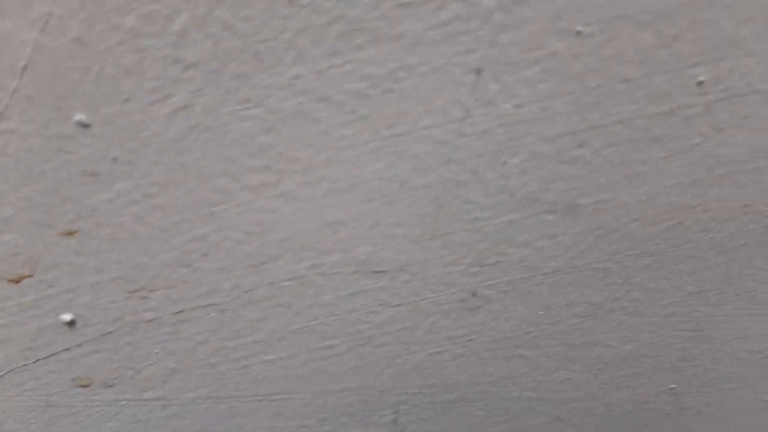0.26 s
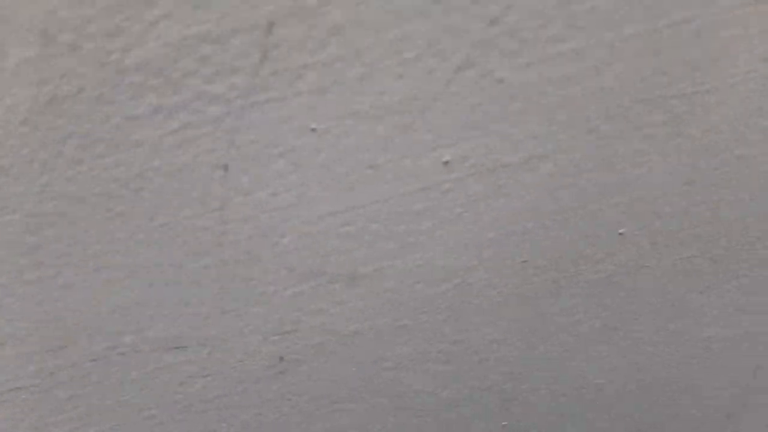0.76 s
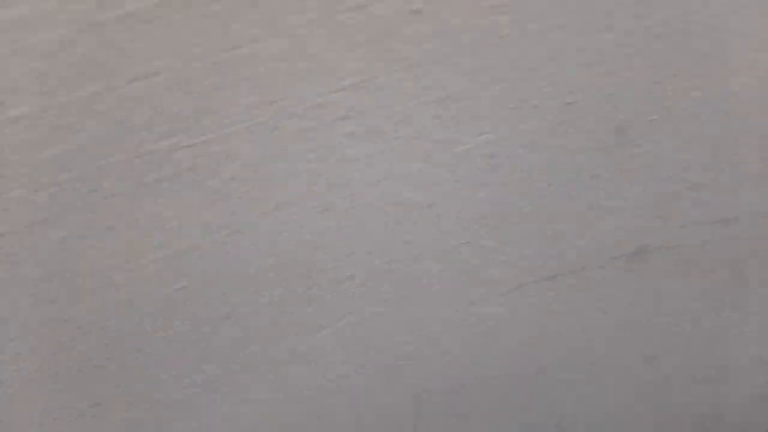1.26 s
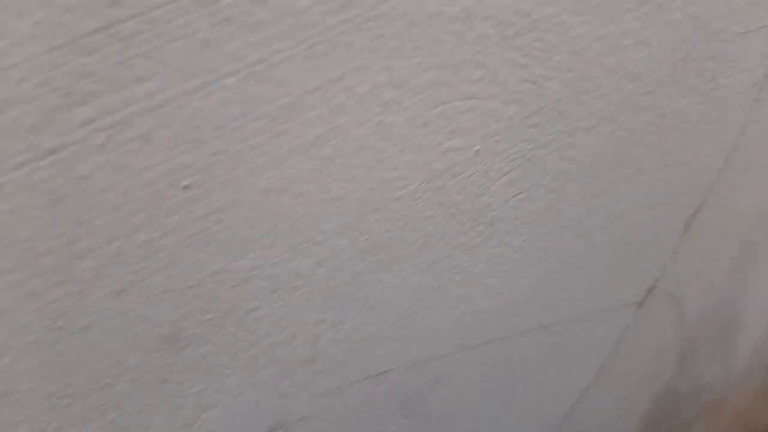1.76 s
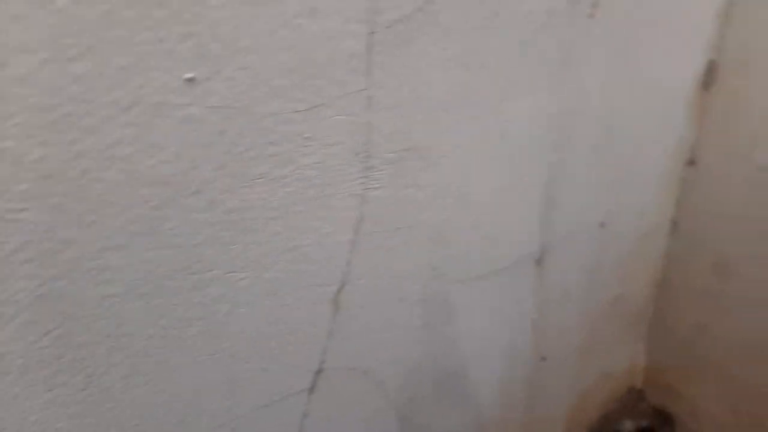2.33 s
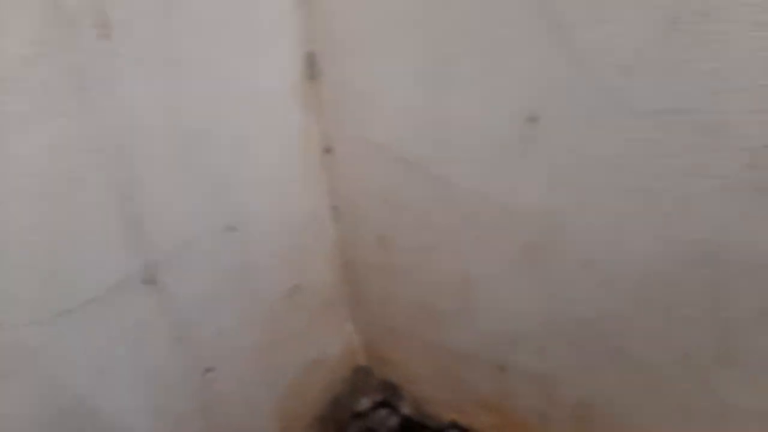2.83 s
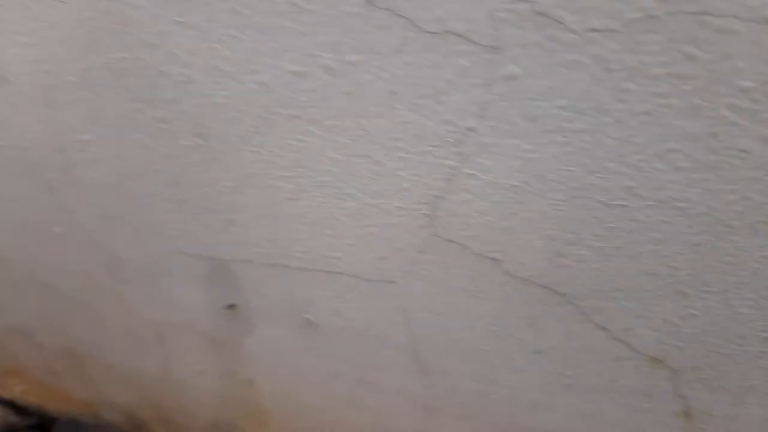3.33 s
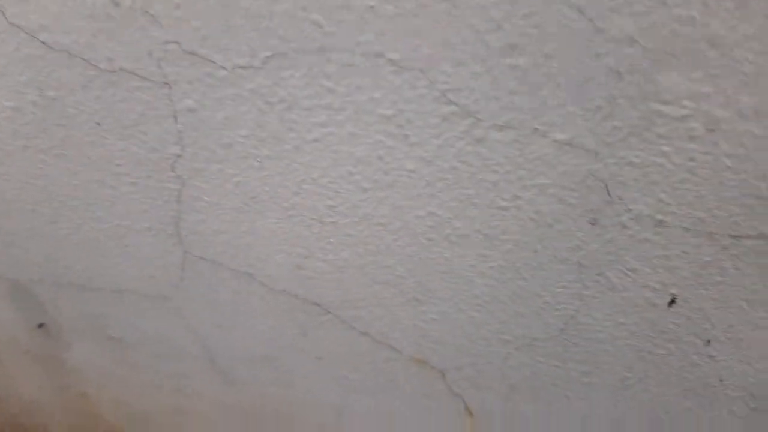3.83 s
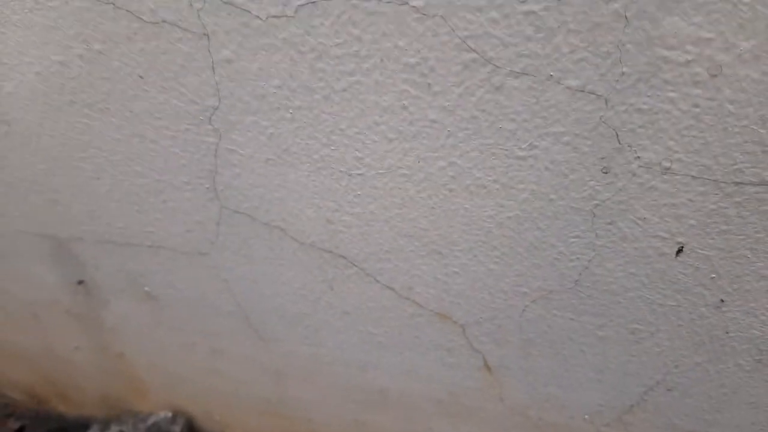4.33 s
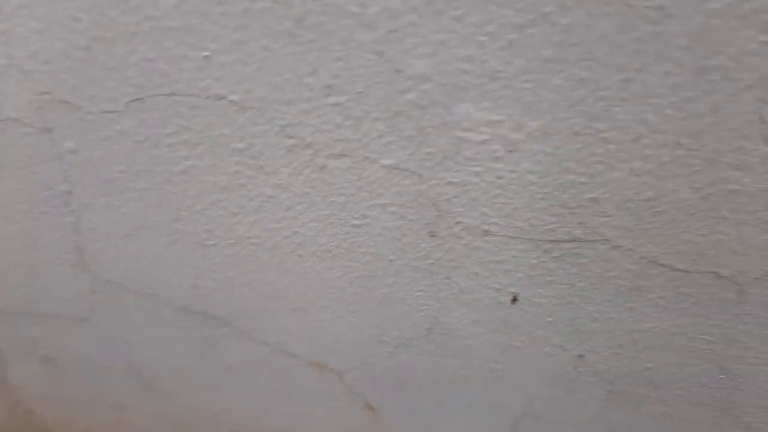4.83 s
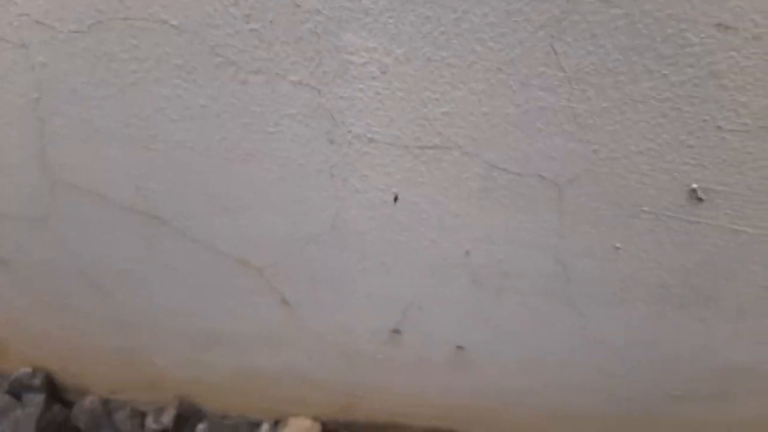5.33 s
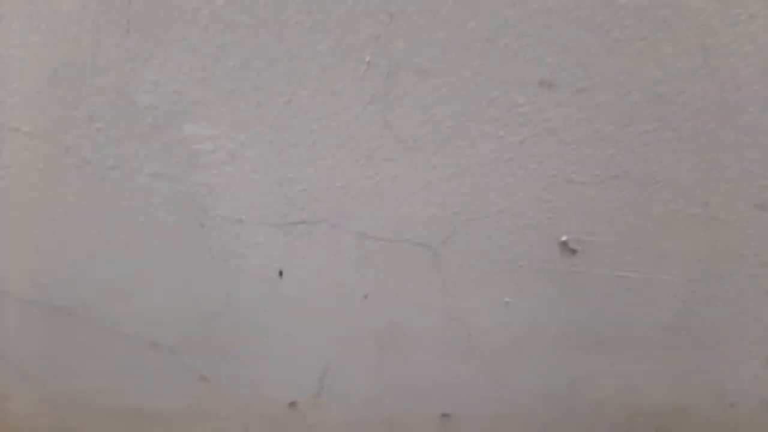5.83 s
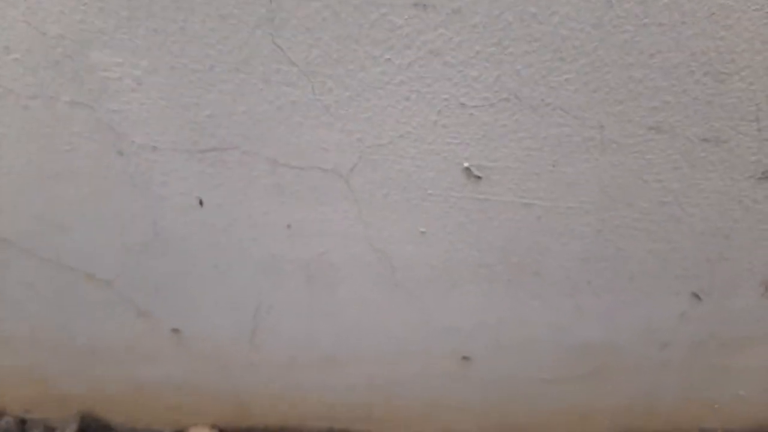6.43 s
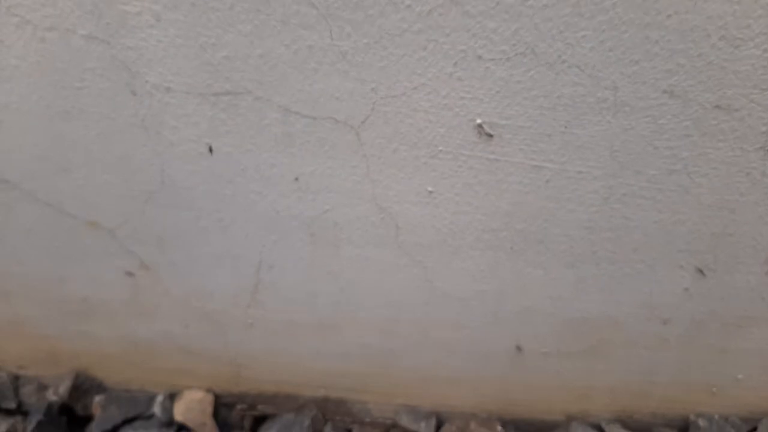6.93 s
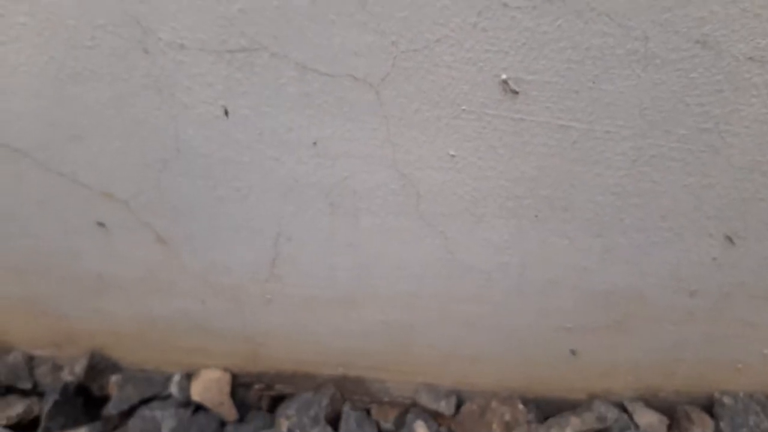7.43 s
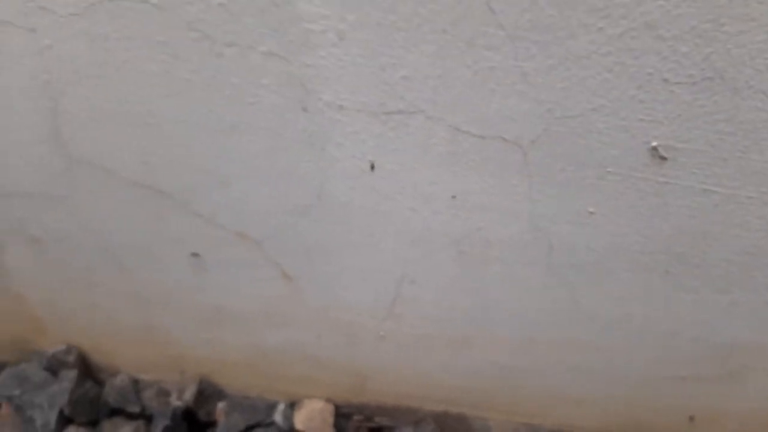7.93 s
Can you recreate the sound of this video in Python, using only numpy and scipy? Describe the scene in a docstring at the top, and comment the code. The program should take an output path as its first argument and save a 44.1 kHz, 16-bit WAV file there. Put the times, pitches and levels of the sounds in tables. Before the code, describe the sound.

An outdoor walled corner heard by close stereo phone microphones just above coarse gravel. Low, slightly left-leaning far machinery hum and a faint airy hiss continue throughout, the hum swelling a little near 4 s. From 0 to 2.4 s there are only soft sole rubs and sparse, tiny stone ticks. From 2.5 s ticks crowd together with light fizz; around 3.6-4.7 s gritty grinding and knocks grow. At 4.85-5.05 s comes the heaviest crunch: loud stony cracks, dull short thuds and a brief echo off the walls. At 5.4-5.7 s a bright, sharp, crackling slide bursts out, then thins away by about 6.1 s. A few faint clicks follow near 6.5-6.7 s. At 6.85-7.2 s a finger rubs roughly on the left only. At 7.2-7.4 s a very faint high whistle arches up and down. One tiny tick at 7.75 s, then hum.

```python
"""Someone crouches with a phone in a walled corner, its microphones just above coarse gravel; far machinery hums
in the corner's resonances and the air hisses throughout. First come faint rubs and sparse stone ticks; from 2.5 s
they crowd together. Weight shifts make the stones fizz and grind, strongest with thuds from 4.9 s, then they thin out.
At 6.9 s a finger brushes the left microphone port, and at 7.2 s a thin whistle passes. Stones are short noise
bursts and damped rings, hum and hiss are filtered noise, and the whistle is one gliding sine."""
import sys
import numpy as np
from scipy import signal
from scipy.fft import rfft, irfft, next_fast_len
from scipy.io import wavfile
from scipy.ndimage import uniform_filter1d, map_coordinates

SR = 44100
rng = np.random.default_rng(int(sys.argv[2]) if len(sys.argv) > 2 else 0)


def dump(signal):
    """Clip the signal to [-1, 1] and save it as 16-bit WAV at the path in sys.argv[1]."""
    limited = np.clip(np.atleast_2d(signal).T, -1, 1)
    pcm = np.round(limited * 32767).astype(np.int16)
    wavfile.write(sys.argv[1], SR, pcm)


N = 360297
TOP_HZ = 15850  # band limit of the microphones

# stone contacts underfoot: (time [s], relative crack level [dB], relative knock level [dB], stone pitch [Hz])
STONE_CONTACTS = [(0.678, -50, -48.5, 2090), (0.9744, -62, -59, 1890), (1.112, -49.5, -52, 4600),
                  (1.2247, -71, -45.5, 2190), (1.3983, -44.5, -83, 10700), (1.5205, -44, -58.5, 12660),
                  (1.9487, -34, -48.5, 6940), (2.2419, -44.5, -43.5, 2062), (2.5087, -34.5, -39, 2320),
                  (2.612, -38.5, -44, 9030), (2.7, -46.5, -56, 9000), (2.7608, -38.5, -46.5, 13400),
                  (2.769, -42, -43, 4435), (2.805, -41, -49.5, 3660), (2.872, -42, -48, 8020),
                  (2.887, -43, -68, 9050), (2.9266, -43, -38.5, 2410), (2.948, -38.5, -53, 2426),
                  (2.991, -43.5, -57, 1590), (3.018, -40, -59, 4400), (3.134, -42, -69, 8990),
                  (3.4443, -40, -50, 12200), (3.62, -43.5, -36, 1180), (3.672, -33.5, -53, 5160),
                  (3.7339, -39, -39, 2550), (3.938, -35, -35.5, 1595), (3.9684, -30, -34, 2373),
                  (3.984, -33, -38.5, 9050), (4.091, -35.5, -62, 4500), (4.3054, -29.5, -42, 5520),
                  (4.338, -40, -35.5, 1506), (4.372, -31, -30, 2410), (4.4696, -31.5, -46, 4570),
                  (4.4973, -32.5, -31.5, 4174), (4.5805, -33.5, -50, 5775), (4.5979, -37, -34, 2002),
                  (4.635, -31.5, -41.5, 8930), (4.6745, -31, -35.5, 6000), (4.7482, -28, -33.5, 3000),
                  (4.809, -26.5, -41, 6000), (4.8597, -8.5, -22, 3100), (4.9004, -12.5, -20, 3210),
                  (4.949, -15.5, -25.5, 7580), (4.9621, -16.5, -20.5, 1400), (4.9703, -17.5, -31.5, 7960),
                  (5.0444, -24, -18.5, 2602), (5.087, -23, -25, 1907), (5.134, -25.5, -38, 1068),
                  (5.21, -27.5, -39, 2600), (5.238, -28.5, -35.5, 1676), (5.255, -26.5, -43.5, 1319),
                  (5.308, -32.5, -43, 1150), (5.3385, -20.5, -42, 2008), (5.353, -20, -37.5, 2522),
                  (5.4077, -13.5, -36, 8990), (5.435, -13, -41, 9520), (5.447, -4.5, -33.5, 12730),
                  (5.531, -7.5, -42.5, 11720), (5.5385, -15, -45.5, 4756), (5.5914, -17, -42.5, 12470),
                  (5.686, -15, -37.5, 11780), (5.709, -18.5, -42.5, 10870), (5.7717, -25.5, -57, 7430),
                  (5.8416, -29.5, -38, 2181), (5.931, -27, -43, 2440), (6.5122, -47, -53.5, 8770),
                  (6.5466, -51.5, -41.5, 2263), (6.735, -57.5, -50, 2994), (7.747, -46, -78, 7230)]


def ticks():
    """Each contact is a crack that rings briefly at the stone's pitch and a duller gritty knock."""
    cracks, knocks = np.zeros((2, N + SR)), np.zeros((2, N + SR))
    t = np.arange(SR // 8) / SR
    for s, crack_db, knock_db, hz in STONE_CONTACTS:
        grit, lean = rng.standard_normal((4, 2, len(t))), rng.standard_normal()
        here = slice(round(s * SR), round(s * SR) + len(t))
        # the ring dies over 30 cycles, so bigger, lower stones ring longer
        strike = amp(-60 * t * hz / 30) * (1 - np.exp(-t / 0.00028))
        strike = strike * (0.5 * grit[3, :1] + grit[3])  # partly shared by both microphones
        ring = signal.lfilter(*signal.iirpeak(hz, 3.5, SR), strike)
        high_pass = signal.butter(1, hz / 3, "high", fs=SR)
        snap = signal.lfilter(*high_pass, amp(-60 * t / 0.022) * grit[0])
        crack = ring / np.abs(ring).max() + 0.35 * snap
        crack = crack / np.abs(crack).max(axis=1, keepdims=True)
        cracks[:, here] += amp(crack_db + 2.0) * sides(1.1 * lean - 1.5)[:, None] * crack
        fade = amp(-60 * t / 0.024) + 0.023 * amp(-60 * t / 0.094)  # the blow, then the stone settling
        knock = fade * (grit[1] + 0.51 * grit[2, :1])
        knocks[:, here] += amp(knock_db + 12) * sides(lean + 3)[:, None] * knock
    return cracks[:, :N] + coloured_knock(knocks[:, :N])


# colour of stones grinding under load, shared by the knocks: (frequency [Hz], relative level [dB])
GRIND_COLOUR = [(120, -1), (250, 1.5), (450, -1), (1000, -5), (1500, -8.5), (3200, -13.5), (10000, -25)]


def coloured_knock(x):
    """Knocks share the low colour of grinding stones."""
    return filtered(x, lambda hz: amp(along(GRIND_COLOUR, hz)))


# how fast the walled corner falls silent: (frequency [Hz], 60 dB decay time [s])
WALL_DECAY = [(300, 0.767), (2000, 0.15), (10000, 0.18)]


def walls(x):
    """The corner answers within milliseconds with a noise tail; each frequency dies at its own speed."""
    hz, t, z = signal.stft(rng.standard_normal((2, SR // 3)), SR, nperseg=256)
    decay = amp(-60 * t / along(WALL_DECAY, hz)[:, None])
    tail = signal.istft(z * decay, SR, nperseg=256)[1]
    delayed = np.pad(x, ((0, 0), (150, 0)))  # samples, 3.4 ms
    return signal.fftconvolve(delayed, tail / np.linalg.norm(tail[0]), axes=1)[:, :N]


# colour of small contacts close to the microphones: (frequency [Hz], relative level [dB])
FIZZ_COLOUR = [(1500, -16), (3000, -9.5), (5000, -3), (8000, -5.5), (11000, -1.5), (14000, -2.5),
               (16000, -7)]


def gravel():
    """Small contacts fizz in the treble; loaded stones grind lower, click against each other and boom in the corner."""
    fizz_db, grind_db = load()
    fizz = crumbs(rate=220, spread_db=5.5, life=0.0039, bed=1.5)
    fizz = coloured(patchy(fizz, depth_db=2.5, span=12), FIZZ_COLOUR)
    sheen = fizz - filtered(fizz, lambda f: 1 / (1 + (f / 7000) ** 2))
    fizz = fizz + np.clip((fizz_db + 36.5) / 22, -.5, 1.5) * sheen  # a harder slide is brighter
    fizz = fizz + 0.2 * chips(rate=150, hz=9200, scatter=0.35, cycles=3.3, spread_db=7.5)
    grind = crumbs(rate=97, spread_db=1.0, life=0.0035, bed=2.4)
    grind = coloured(patchy(grind, depth_db=1.0, span=6), GRIND_COLOUR)
    grind = grind + 0.32 * chips(rate=140, hz=1595, scatter=.6, cycles=2.0, spread_db=8.0)
    grind = grind + 0.38 * ambient(resonances(CORNER_MODES[-3:]))  # only the upper modes boom
    fizz_gain = amp(fizz_db + 2.0 + 0.5 * wobble(30)) * sides(-0.69)[:, None]
    grind_gain = amp(grind_db + 1.0 + 1.5 * wobble(25)) * sides(3.9)[:, None]
    return fizz_gain * fizz + grind_gain * grind


# weight shifting on the gravel: (full-load time [s], build-up [s], hold [s],
# relative fizz level [dB], relative grind level [dB])
WEIGHT_SHIFTS = [(0.0, .01, 0.082, -65.5, -67), (2.497, 0.016, 0.018, -56.5, -58),
                 (2.603, 0.11, 0.089, -60.5, -61.5), (2.754, 0.058, 0.33, -55.5, -61),
                 (3.605, 0.043, 0.069, -46.5, -48.5), (3.967, 0.18, 0.02, -53.5, -52.5),
                 (4.147, 0.19, 0.19, -44.5, -53), (4.484, .07, .01, -45.5, -43.5),
                 (4.622, 0.056, 0.13, -50, -45), (4.798, 0.37, 0.042, -43.5, -43),
                 (4.86, 0.014, 0.019, -45.5, -28), (4.961, 0.07, 0.012, -33.5, -34.5),
                 (5.048, 0.022, 0.13, -41.5, -34.5), (5.363, 0.065, 0.067, -47.5, -36),
                 (5.445, 0.076, 0.021, -21.5, -44.5), (5.535, .004, 0.016, -28, -44.5),
                 (5.573, 0.073, 0.037, -30.5, -35.5), (5.689, 0.0034, 0.016, -32, -50),
                 (5.915, 0.6, 0.12, -50, -47), (6.131, .1, 0.1, -60.5, -64),
                 (6.523, 0.026, 0.066, -61.5, -72)]
# faint stirring between the shifts: (time [s], relative fizz level [dB], relative grind level [dB])
FAINT_STIRRING = [(0, -70.5, -76), (1.4, -72.5, -81), (2.45, -72, -75.5), (3.2, -69, -59.5),
                  (3.55, -58, -91.5), (3.9, -62.5, -66.5), (5.3, -47, -47.5), (6.3, -75, -87),
                  (6.45, -84, -99)]
BUILD_DB = 23.5  # climb over each build-up
RELEASE_DB_PER_S, GRIND_RELEASE_DB_PER_S = 151, 139.5  # fall after the hold


def load():
    """Fizz and grind levels in dB: every shift builds up, holds and lets go, over the faint stirring."""
    t = np.arange(N) / SR
    fizz_db, grind_db = curves(FAINT_STIRRING)
    fizz_power, grind_power = amp(fizz_db) ** 2, amp(grind_db) ** 2
    for s, build, hold, fizz_db, grind_db in WEIGHT_SHIFTS:
        early_db = BUILD_DB * np.clip(s - t, 0, 1) / abs(build)
        late = np.clip(t - s - hold, 0, 1)  # seconds since the hold ended
        fizz_power = fizz_power + amp(fizz_db - early_db - RELEASE_DB_PER_S * late) ** 2
        grind_power = grind_power + amp(grind_db - early_db - GRIND_RELEASE_DB_PER_S * late) ** 2
    return 10 * np.log10(fizz_power), 10 * np.log10(grind_power)


def crumbs(rate, spread_db, life, bed):
    """Noise in sudden short bursts of random size over an even bed; both ports get the same bursts."""
    sizes = amp(spread_db * np.minimum(rng.exponential(size=N), 3))
    starts = (rng.random(N) < rate / SR) * sizes
    bursts = signal.lfilter([1], [1, -np.exp(-1 / (life * SR))], starts)
    return (bed + unit(bursts)) * rng.standard_normal((2, N))


def chips(rate, hz, scatter, cycles, spread_db):
    """Many tiny stone clicks, each a damped ring at its own pitch, strength and side."""
    count, t = int(rate * N / SR), np.arange(SR // 100) / SR
    when, size = rng.random((count, 2)).T
    pitch, lean = rng.standard_normal((count, 2)).T
    pitch = np.clip(hz * np.exp(scatter * pitch), 300, TOP_HZ)[:, None]
    strength = amp(-spread_db * np.log(size + 0.098))[:, None]
    rings = strength * np.exp(-t * pitch / cycles) * np.sin(2 * np.pi * pitch * t)
    where = ((when * N).astype(int)[:, None] + np.arange(len(t))).ravel()
    ports = [np.bincount(where, (g[:, None] * rings).ravel(), N + SR)[:N] for g in sides(4 * lean)]
    return unit(np.array(ports))


# weight landing on the ground: (time [s], relative level [dB])
LANDINGS = [(3.968, -22.5), (4.859, -10), (4.899, -21.5), (4.952, -19.5), (5.046, -30)]
# modes of the stone bed under a foot: (frequency [Hz], relative level [dB], 60 dB decay time [s])
STONE_BED_MODES = [(116.4, 6.5, 0.046), (169.5, 5, 0.088), (281.3, 3, 0.092), (422.7, -5, 0.1208)]


def thuds():
    """A foot settling pushes the stone bed, which rings low and briefly."""
    out, t = np.zeros((2, N + SR)), np.arange(SR // 5) / SR
    ring = sum(amp(level - 60 * t / t60) * np.sin(2 * np.pi * hz * t) for hz, level, t60 in STONE_BED_MODES)
    ring = ring * (1 - np.exp(-t / 0.0029))  # the sole lands softly
    for s, db in LANDINGS:
        out[:, round(s * SR):][:, :len(t)] += amp(db - 8.0) * ring
    return filtered(out[:, :N], lambda hz: sides(along(PORT_LEAN, hz)))


# a sole rubbing softly over stones: (start time [s], length [s], level before the swell [dB], centre frequency [Hz])
SOLE_RUBS = [(0, 0.16, -77, 1810), (0.323, 0.05, -64, 890), (0.417, 0.12, -64, 1960),
             (0.672, 0.085, -52, 570), (0.93, 0.16, -65, 543), (1.225, 0.074, -58, 705),
             (1.476, 0.059, -62, 547), (2.24, 0.09, -59, 1780), (3.097, 0.069, -51, 1670),
             (3.581, 0.19, -46.5, 503), (3.9, 0.18, -49.5, 1900), (5.43, 0.06, -33.5, 406.4),
             (5.5, 0.2, -40, 420.4), (5.679, 0.11, -39.5, 1011), (6.534, 0.11, -59, 1080)]


def rubs():
    """Gritty noise in one resonance; each rub starts quickly and trails off."""
    out, grit = np.zeros((2, N)), crumbs(rate=200, spread_db=6.0, life=0.0065, bed=0.96)
    for s, length, db, hz in SOLE_RUBS:
        u = np.arange(int(length * SR)) / (length * SR)
        here = slice(round(s * SR), round(s * SR) + len(u))
        peak = signal.iirpeak(hz, 1.4, SR)
        band = signal.lfilter(*peak, signal.lfilter(*peak, grit[:, here]))
        swell = np.sin(np.pi * u ** 0.53)
        out[:, here] += amp(db) * sides(2.6)[:, None] * swell * unit(band)
    return out


# finger strokes touching the left port: (start time [s], length [s], hiss level [dB], scrape level [dB])
FINGER_STROKES = [(6.854, 0.005, -57.5, -39), (6.873, 0.079, -45, -27.5), (6.962, 0.0038, -50.5, -49),
                  (6.998, 0.049, -60, -44), (7.027, 0.073, -56, -59), (7.086, 0.13, -45, -59)]
# colour of the smooth hiss of skin: (frequency [Hz], relative level [dB])
SKIN_COLOUR = [(470, -42), (800, -25), (1420, -2.5), (2500, -11.5), (4500, -3), (16000, -13.5)]
# colour of the rough scrape: (frequency [Hz], relative level [dB])
SCRAPE_COLOUR = [(150, -8), (350, 3.5), (700, 1), (1150, -6.5), (1500, -26), (2200, -18.5), (3200, -35.5)]


def finger():
    """Skin sliding over one port: a smooth hiss and a rough low scrape that the other port does not get."""
    t, hiss_gain, scrape_gain = np.arange(N) / SR, 0, 0
    for s, length, hiss_db, scrape_db in FINGER_STROKES:
        press = np.sin(np.pi * np.clip((t - s) / length, 0, 1))  # each stroke swells and lets go
        hiss_gain = hiss_gain + amp(hiss_db) * press ** 2.0
        scrape_gain = scrape_gain + amp(scrape_db) * press ** 0.57
    rough = crumbs(rate=1000, spread_db=0.0, life=0.0013, bed=0.31)[0]
    hiss = hiss_gain * coloured(rng.standard_normal(N), SKIN_COLOUR)
    scrape = scrape_gain * coloured(rough, SCRAPE_COLOUR)
    return (hiss + scrape) * [[1], [0]]  # left only


WHISTLE_S, WHISTLE_LENGTH_S, WHISTLE_DB = 7.2, 0.23, -74  # start, length, mean level at the crest
LOW_HZ, ARCH_HZ, CREST = 10160, 1100, 0.66  # pitch at rest, rise to the crest, place of the crest within the length


def whistle():
    """A faint high tone that arches up and down, louder near the crest, unsteady in strength and pitch."""
    u = (np.arange(N) / SR - WHISTLE_S) / WHISTLE_LENGTH_S
    arch = np.exp(-((u - CREST) / 0.24) ** 2)
    gate = uniform_filter1d(1. * ((u > 0) & (u < 1)), size=400)
    level_db = WHISTLE_DB - 10 * (1.0 - arch) + 4.3 * wobble(84)
    hz = LOW_HZ + ARCH_HZ * arch + 90 * wobble(150)
    return gate * amp(level_db) * np.sin(2 * np.pi * np.cumsum(hz) / SR)


# far machinery hum: (time [s], level [dB])
HUM_LEVEL = [(0.0, -43), (3.71, -42), (3.96, -37.5), (8.17, -44.5)]
# resonances of the walled corner: (frequency [Hz], width before the skirts are steepened [Hz], relative level [dB])
CORNER_MODES = [(50.4, 12, -9), (73.56, 11, 3.5), (108.3, 44, 0), (154.1, 12, -2.5), (183.9, 26.2, -5.5),
                (296.4, 44, -14.5), (420.5, 54, -23), (535.4, 80, -32)]
# colour of the open air: (frequency [Hz], relative level [dB])
AIR_COLOUR = [(180, -21), (300, -3), (412, -19.5), (801, -36), (2210, -34), (5900, -43.5), (12100, -41.5),
              (16000, -41.5)]


def background():
    """The far hum swells slowly in the corner's resonances; the air hisses in soft patches."""
    [hum_db] = curves(HUM_LEVEL)
    hum = amp(hum_db) * ambient(resonances(CORNER_MODES))
    air = ambient(lambda hz: amp(along(AIR_COLOUR, hz)))
    return hum + amp(-62) * patchy(air, depth_db=1.3, span=24)


def resonances(modes):
    """Gain of a set of (Hz, width, dB) peaks with steep skirts."""
    def peak(f, centre, width, db):
        damping = (f * width) ** 2
        return amp(db) * damping / ((centre * centre - f * f) ** 2 + damping)
    return lambda f: np.sqrt(sum(peak(f, *mode) ** 2 for mode in modes))


# likeness of the two ports: (frequency [Hz], left-right correlation [0 to 1])
PORT_LIKENESS = [(60, 0.87), (200, 0.8), (300, 0.88), (640, 0.51), (1400, 0.0284)]
# lean towards the left port: (frequency [Hz], left-right difference [dB])
PORT_LEAN = [(60, 8.5), (200, 5.5), (330, 1), (700, 10.5), (2400, 0.5), (15000, 6)]


def ambient(gain):
    """Stereo noise of rms 1, as alike and as lopsided as the two ports hear the place."""
    def mid_side(hz):
        turn = np.arccos(np.clip(along(PORT_LIKENESS, hz), -1, 1)) / 2
        return gain(hz) * [np.cos(turn), np.sin(turn)]
    mid, side = filtered(rng.standard_normal((2, N)), mid_side)
    return unit(filtered(np.array([mid + side, mid - side]), lambda hz: sides(along(PORT_LEAN, hz))))


def patchy(x, depth_db, span):
    """x with patches of random gain, span by span cells of frequency and time."""
    z = signal.stft(x, nperseg=256)[2]
    field = uniform_filter1d(rng.standard_normal(z.shape[1:]), span, 0)
    field = uniform_filter1d(field, span, 1)
    return signal.istft(z * amp(depth_db * unit(field)), nperseg=256)[1][:, :N]


def amp(db):
    """Amplitude of a level in dB."""
    return 10 ** (np.asarray(db) / 20)


def unit(x):
    """x at rms 1."""
    return x / np.sqrt(np.mean(x ** 2) + 1e-20)


def along(points, hz):
    """(Hz, value) points on a log axis."""
    f, v = np.transpose(points)
    return np.interp(np.log(hz + 1), np.log(f + 1), v)


def curves(rows):
    """One value per sample for each column after the time."""
    s, *cols = np.transpose(rows)
    return [np.interp(np.arange(N) / SR, s, c) for c in cols]


def wobble(rate):
    """A smooth random curve, rate knots a second."""
    knots = rng.standard_normal(int(N * rate / SR) + 4)
    return map_coordinates(knots, [np.arange(N) * rate / SR])


def filtered(x, response):
    """x times a response of frequency."""
    m = next_fast_len(N + SR // 2)
    return irfft(rfft(x, m) * response(np.fft.rfftfreq(m, 1 / SR)), m)[..., :N]


def coloured(x, spectrum):
    """x shaped by the given spectrum, rms 1."""
    return unit(filtered(x, lambda hz: amp(along(spectrum, hz))))


def sides(db):
    """Left and right gains for a left-right difference in dB."""
    return amp(np.array([db / 2, -db / 2]))


def scene():
    """Stones and their echo off the walls, the footing, the finger, the whistle and the place itself."""
    stones = ticks()
    underfoot = stones + amp(-3.5) * walls(stones) + thuds() + gravel() + rubs()
    return underfoot + finger() + whistle() + background()


def record(dry):
    """The microphones roll off the deepest bass and round off the highest peaks; nothing is kept above the band limit."""
    rounded = dry / (1 + np.abs(dry / .9) ** 4) ** (1 / 4)
    return filtered(rounded, lambda hz: hz ** 4 / (hz ** 4 + 36 ** 4) * (hz < TOP_HZ))


dry = scene()
out = record(dry)
dump(out)
```